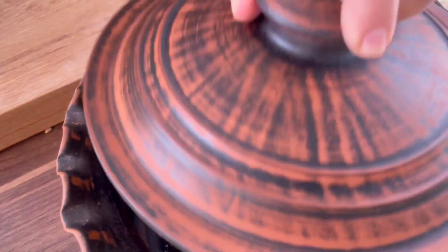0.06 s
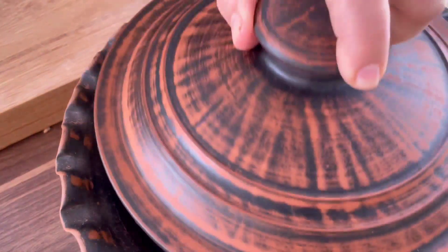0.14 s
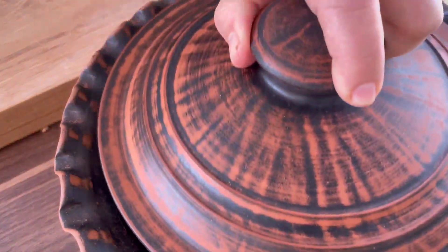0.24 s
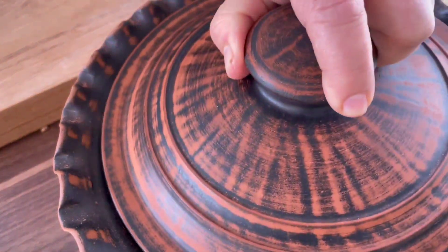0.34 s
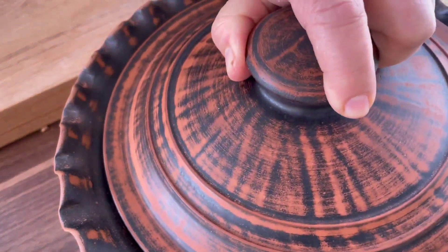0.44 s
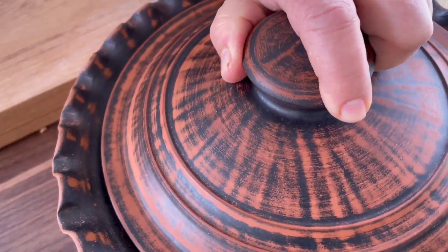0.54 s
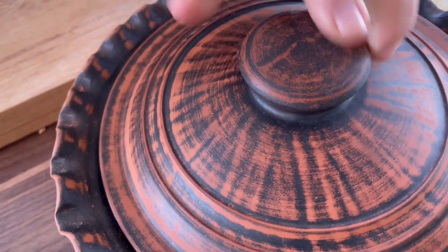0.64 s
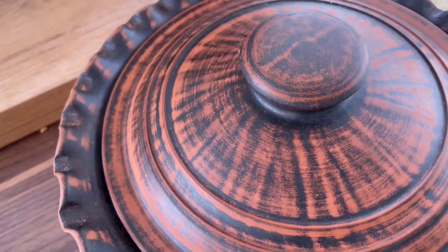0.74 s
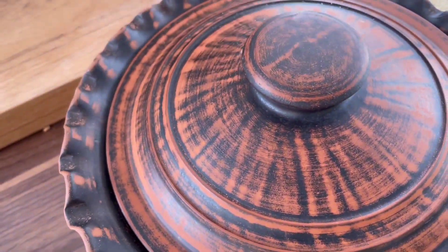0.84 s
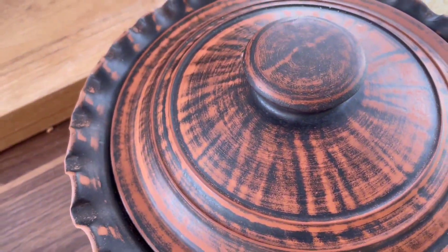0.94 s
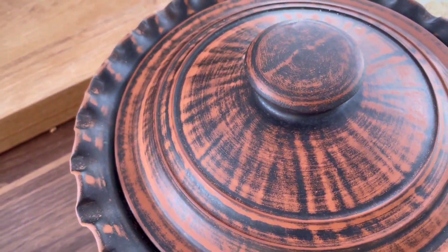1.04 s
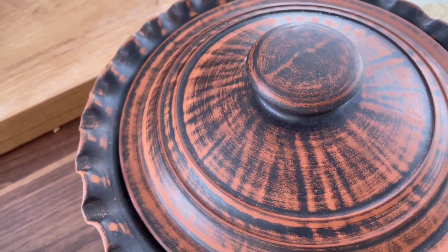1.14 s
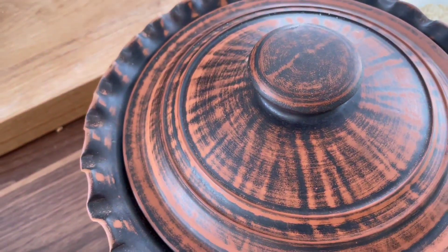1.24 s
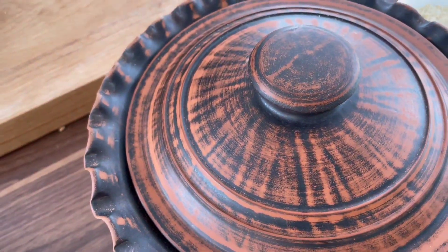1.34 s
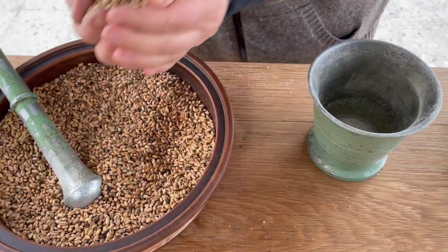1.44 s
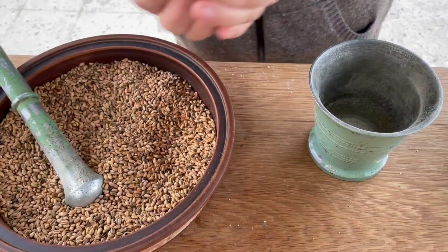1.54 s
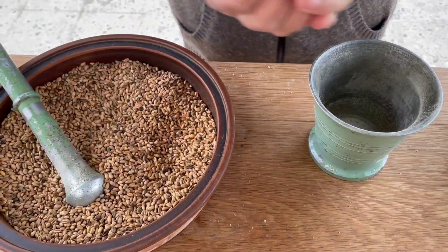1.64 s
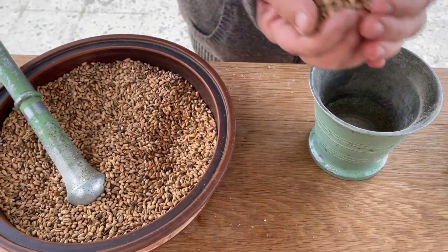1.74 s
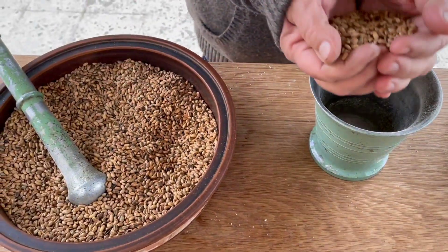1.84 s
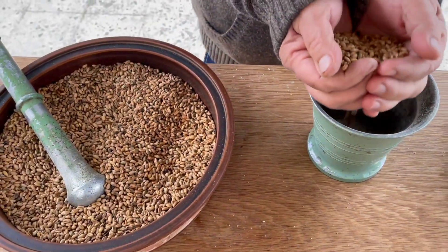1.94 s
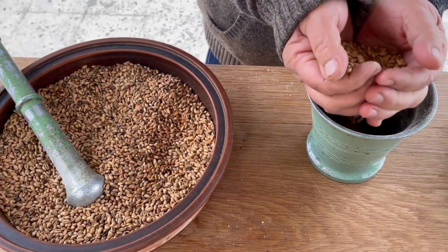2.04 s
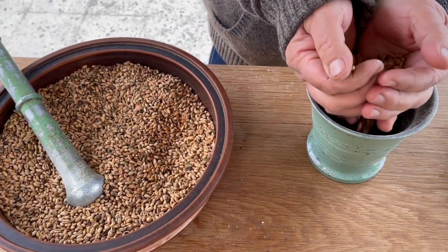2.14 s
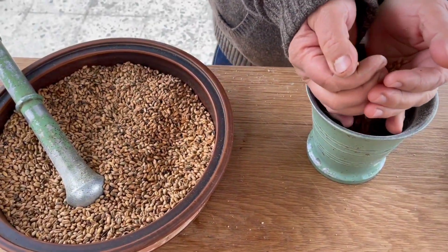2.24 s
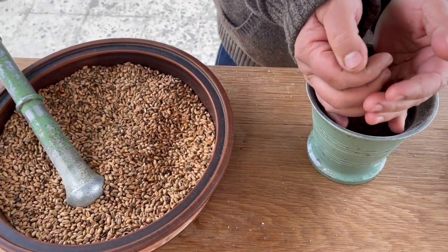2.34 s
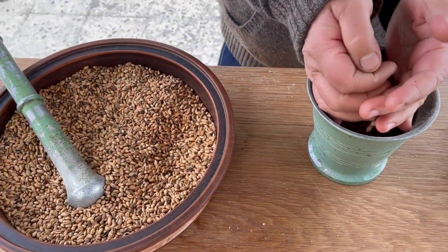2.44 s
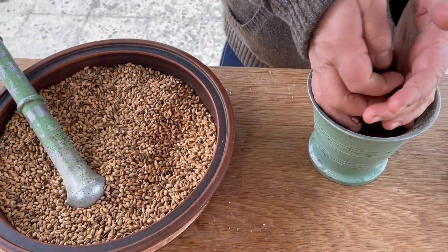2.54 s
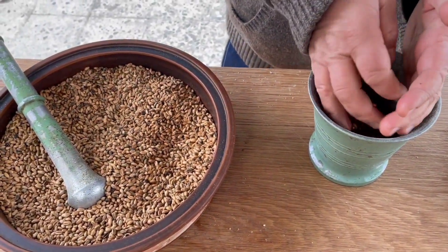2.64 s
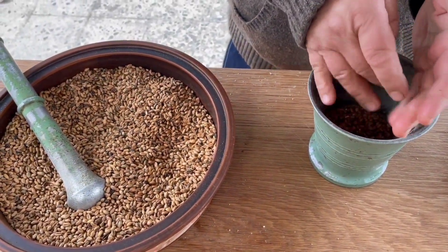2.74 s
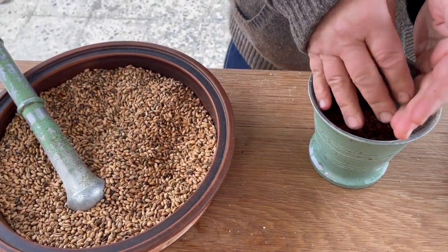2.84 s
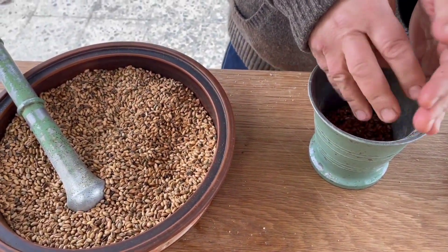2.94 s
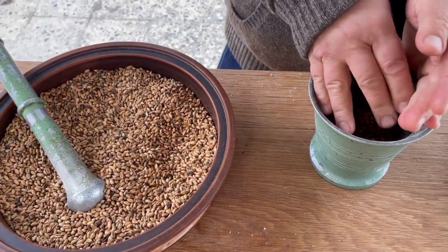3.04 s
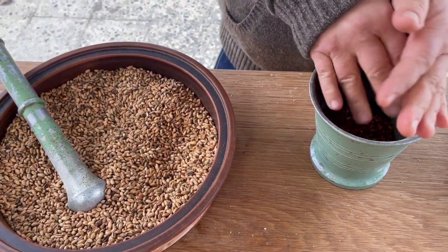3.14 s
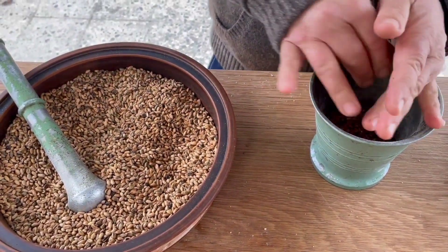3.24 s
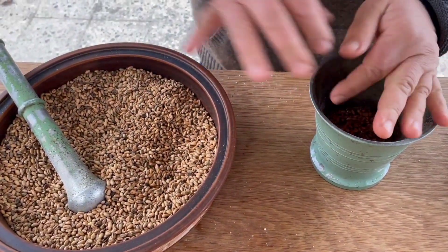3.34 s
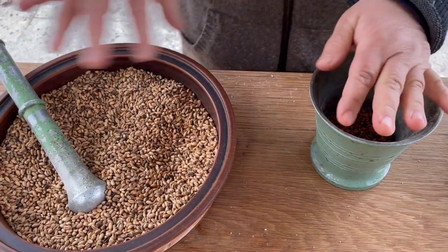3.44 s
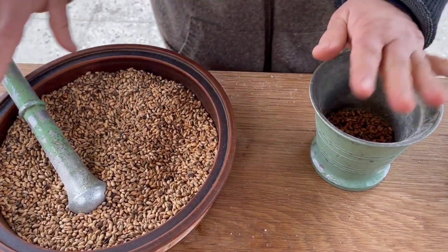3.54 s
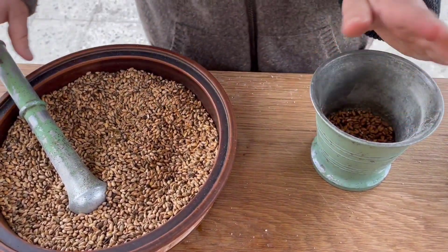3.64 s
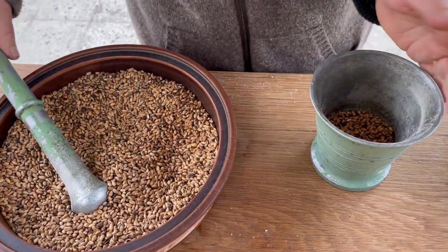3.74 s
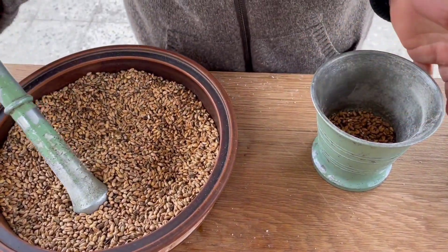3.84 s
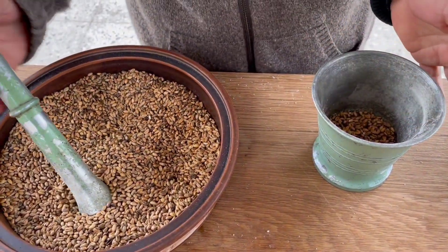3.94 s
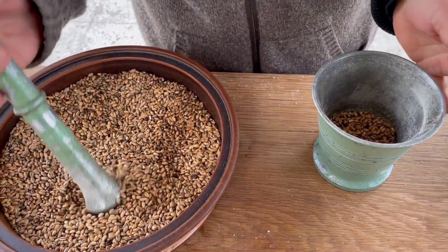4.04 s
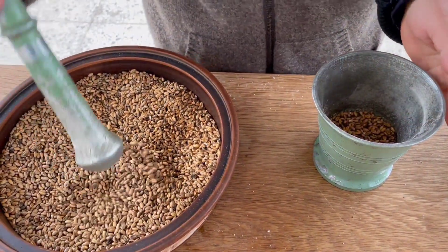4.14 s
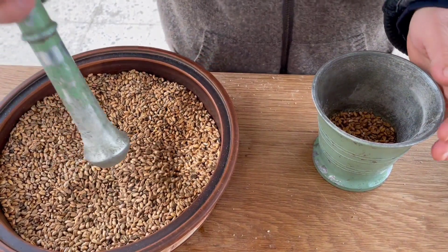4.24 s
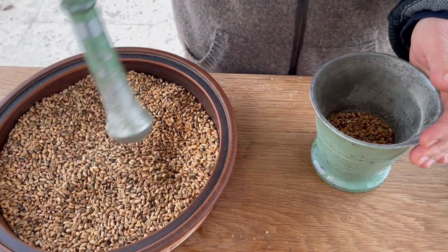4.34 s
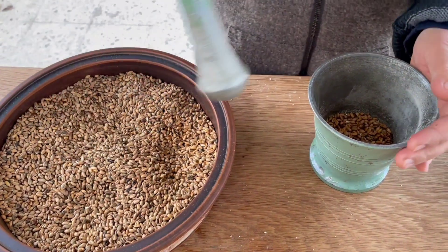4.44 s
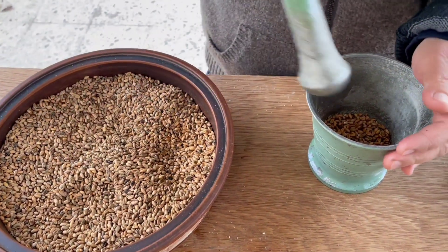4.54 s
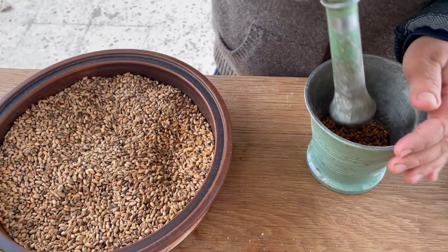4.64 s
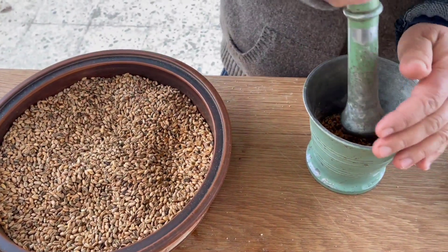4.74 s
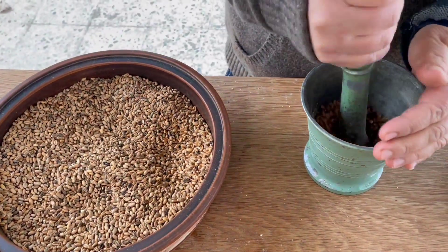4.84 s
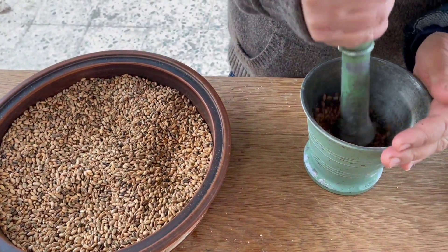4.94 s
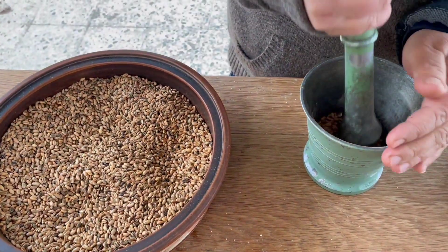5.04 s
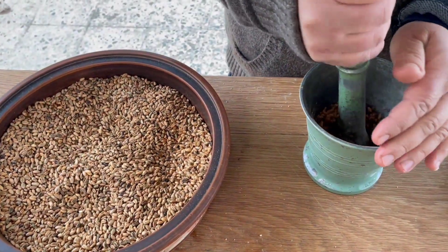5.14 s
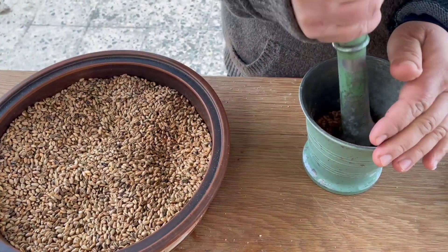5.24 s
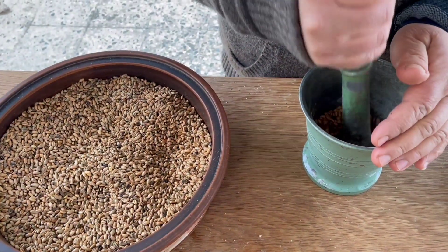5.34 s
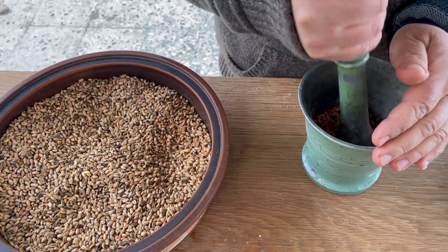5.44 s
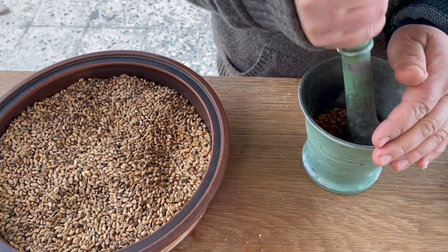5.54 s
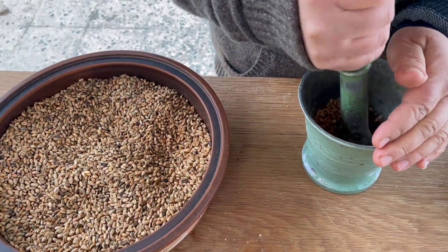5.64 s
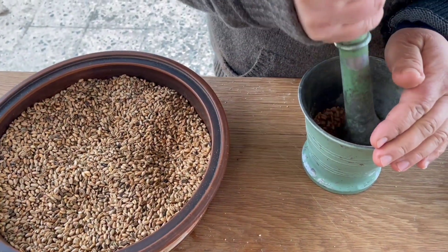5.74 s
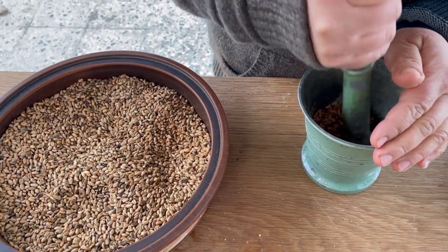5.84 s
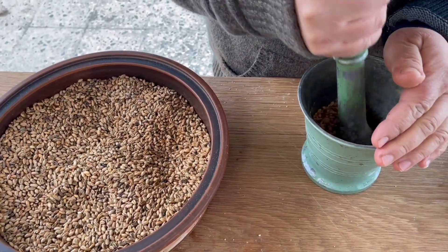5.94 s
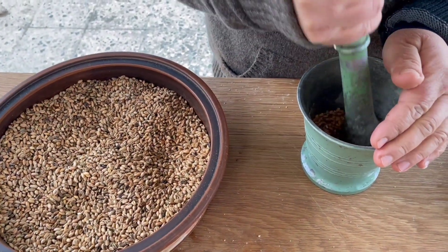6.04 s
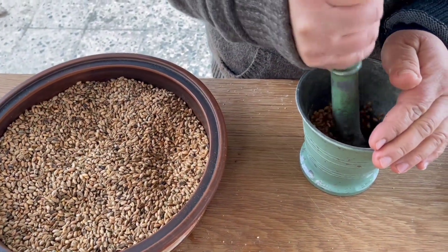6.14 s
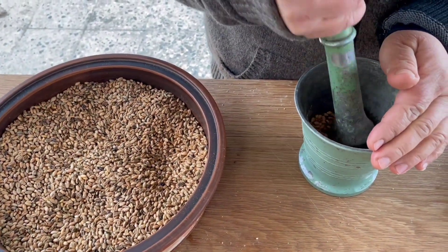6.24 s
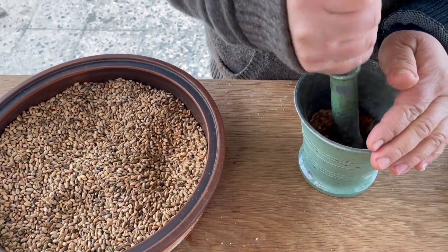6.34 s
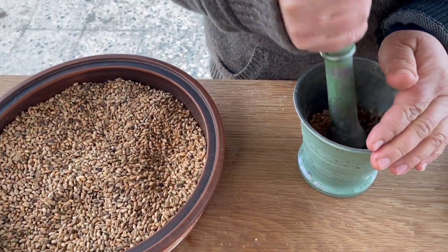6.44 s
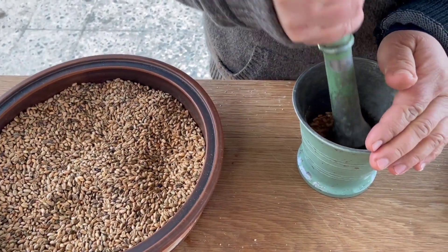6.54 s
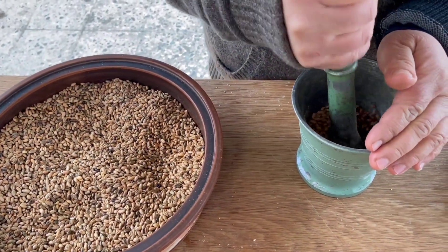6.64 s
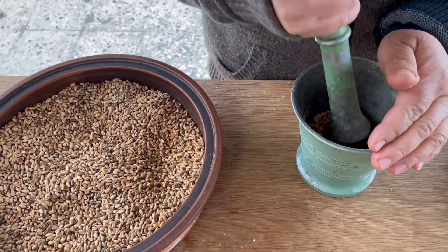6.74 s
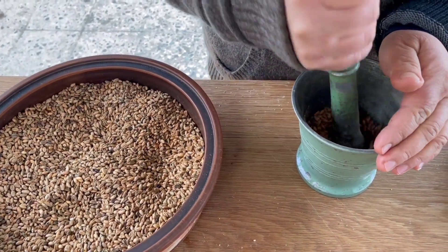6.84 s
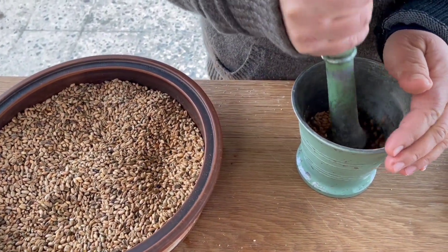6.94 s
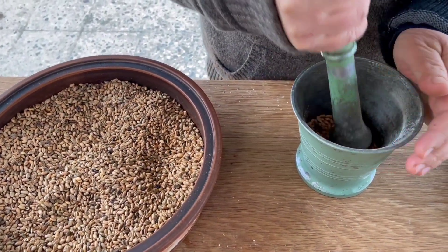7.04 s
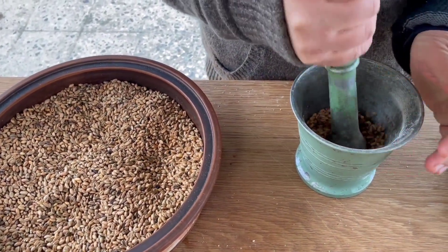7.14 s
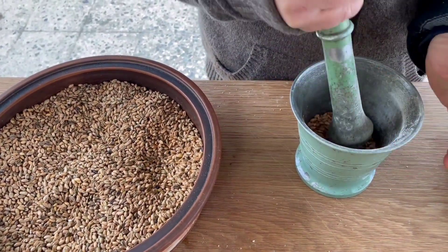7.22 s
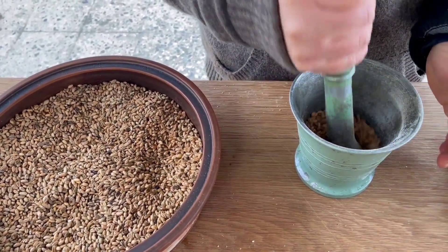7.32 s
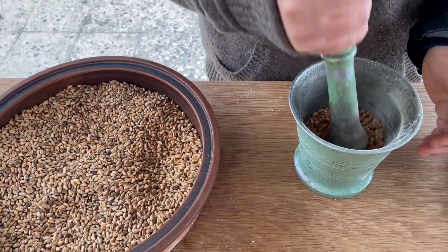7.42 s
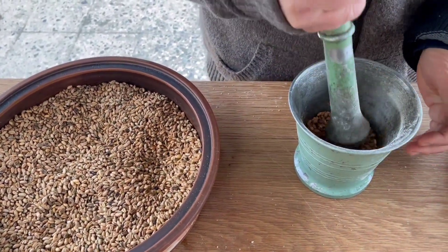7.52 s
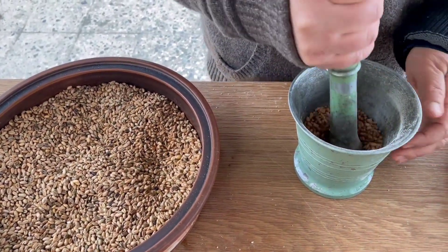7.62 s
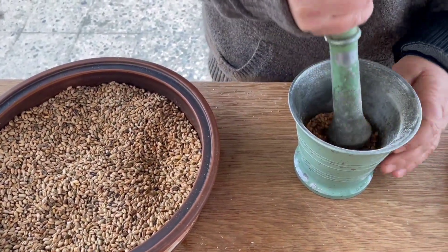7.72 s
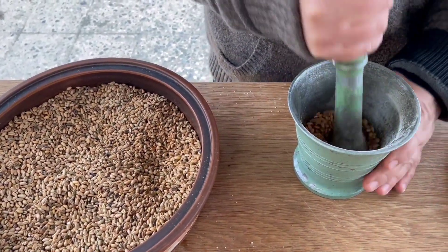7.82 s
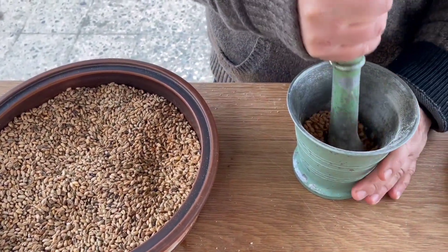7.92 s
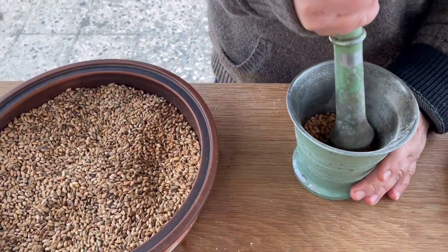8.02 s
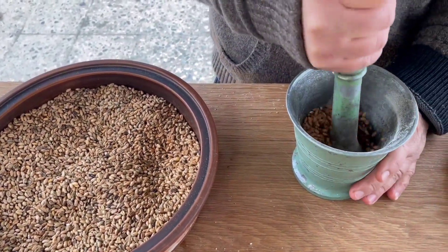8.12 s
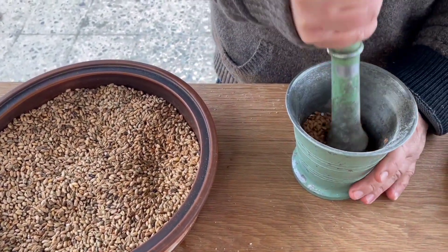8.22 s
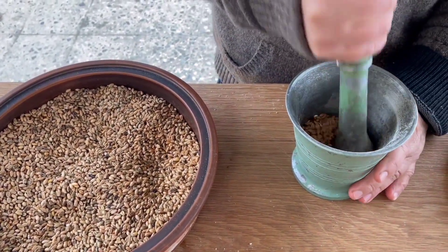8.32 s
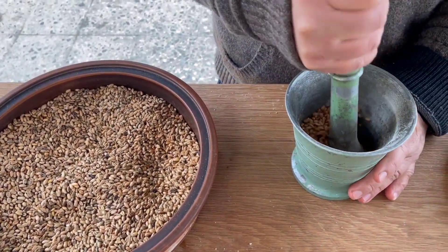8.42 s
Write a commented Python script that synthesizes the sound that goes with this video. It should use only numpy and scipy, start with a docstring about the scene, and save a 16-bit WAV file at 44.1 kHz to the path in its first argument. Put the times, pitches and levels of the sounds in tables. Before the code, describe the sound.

Close stereo outdoors: a fired-clay lid lands on a bowl with hollow clunks and a few settling knocks. Grain then rustles softly by hand into a small metal mortar, with tiny bright pings. A pestle pounds it about four times a second, each blow a crunch, a dull board thud and a faint thin clink. Birds whistle and chirp throughout over quiet air, and light wind rumbles on the microphones.

```python
"""A short soft band of hiss opens the scene while a clay lid is lowered and rocks on its bowl: each contact
sums dying modes and a crack. Then grain is poured by hand into a small metal mortar on a board: random
clicks rustle, modes ping. A pestle then pounds it four times a second: a crunch, a thud through the board,
a thin ring of the metal. Throughout, birds whistle in the garden as gliding sines with echoes, over a bed
of air noise, and a light wind rumbles and thumps on the two microphone ports as shaped noise and bumps."""
import sys
import numpy as np
from scipy import signal
from scipy.fft import rfft, irfft, next_fast_len
from scipy.io import wavfile
from scipy.ndimage import uniform_filter1d

SR = 44100
rng = np.random.default_rng(int(sys.argv[2]) if len(sys.argv) > 2 else 0)


def to_wav(s):
    """Save 16-bit WAV."""
    ch = np.atleast_2d(s).T  # columns
    pcm = np.round(np.clip(ch, -1, 1) * 32767)  # PCM
    wavfile.write(sys.argv[1], SR, pcm.astype(np.int16))


def volts_from_decibels(level):
    """Turn decibel levels (scalar or array-like) into linear amplitude factors."""
    exponent = np.asarray(level, float) / 20
    return 10 ** exponent


N = 373960

# Modes of the metal mortar. Each row: frequency in Hz, level in dB, free ring time (t60) in seconds.
MORTAR = [(1733, -15, .22), (10910, -14, .1), (11900, -16, .1), (12530, -14, .06), (12663, 0, .15),
          (12810, -11, .065), (13680, -13, .07), (14340, -18, .08)]
# Spectrum of cracking and rubbing kernels. Each row: frequency in Hz, density in dB per Hz.
CRUNCH = [(500, 1), (900, -12.5), (3000, -1), (6500, -9.5), (10000, 0.5), (13000, -4.5), (15200, -10.5),
          (16200, -56)]
# Strength of the wind on the ports. Each row: time in seconds, rumble in dB, buffeting in dB.
WIND = [(0, -52.5, -65), (0.13, -59, -56), (0.3, -35, -27.5), (0.55, -37, -49), (0.85, -25, -42),
        (1.15, -39.5, -51), (1.6, -39.5, -55.5), (1.85, -63.5, -65.5), (2.1, -44.5, -55.5), (3, -45.5, -53),
        (3.3, -43, -44), (3.55, -42, -51.5), (4.2, -38.5, -41.5), (5, -35.5, -37.5), (6, -35, -35.5),
        (7, -32.5, -37), (7.5, -36.5, -41.5), (8.48, -36, -34)]
# Spectrum of the buffeting. Each row: frequency in Hz, density in dB per Hz.
BUFFET = [(90, -6.5), (160, 2), (330, -9.5), (600, -23), (1200, -48), (3500, -89)]


def pestle():
    """Fracture, then impact: the head cracks kernels, thuds, and clinks on the metal bottom."""
    # Pestle blows. Each row: start in seconds, thud in dB, upper thud in dB relative to it,
    # click on the bottom in dB, ring of the metal in dB.
    blows = [(4.879, -8.5, 6, -13.5, -24.5), (5.137, -9.5, -1.5, -30, -29.5), (5.39, -12.5, 1.5, -19, -24),
             (5.633, -11, 0, -19, -51), (5.887, -11, 5, -10.5, -25), (6.13, -8.5, -0.5, -15.5, -59),
             (6.38, -9, 6.5, -11, -19.5), (6.636, -8.5, 1.5, -19, -24), (6.887, -8, 5.5, -16.5, -36),
             (7.123, -12, -4, -15.5, -29), (7.392, -10, 3.5, -20, -24.5), (7.65, -10, 1, -13, -28.5),
             (7.902, -8.5, 0.5, -21, -22), (8.16, -10, 14, -38, -28.5), (8.407, -8.5, 9.5, -10, -25)]
    # The head clicks a second time on the bottom: start in seconds, level in dB.
    rebound_s, rebound_db = (6.386, -11.5)
    # The pestle knocks as it leaves the dish. Each row: start in seconds, thud in dB, upper thud in dB relative.
    lift = [(3.985, -47, 26.5), (4.014, -40, 26.5)]
    # Left over right level of the board sound. Each row: frequency in Hz, difference in dB.
    board_tilt = [(300, -0.5), (650, -10), (780, 6), (1400, 1.3)]
    # Extra phase of the later blows, which lag on the left. Each row: frequency in Hz, left lead in radians.
    late_lead = [(200, -0.05), (350, -1.5), (550, -2.5), (750, -5.5)]
    late_s = 6.25
    crunch_lead_s = 0.037  # kernels crack before the thud
    hand_off_s, hand_damping = 7.05, 0.23  # until the palm leaves the rim, ring times shrink by this factor

    out = np.zeros(N)
    t = np.arange(SR // 8) / SR
    before_db = 7 * (t / crunch_lead_s - 1)
    after_db = -(t - crunch_lead_s) * 1900
    swell = np.minimum(t / 0.0041, 1) * volts_from_decibels(np.where(t < crunch_lead_s, before_db, after_db))
    for s, db, upper_db, click_db, ring_db in blows:
        crunch_db = db - 24 + 0.21 * upper_db  # louder in a brighter blow
        crunch = swell * colour(crackle(len(t), 7000, 1.8), CRUNCH)
        add(out, s - crunch_lead_s, volts_from_decibels(crunch_db) * crunch)
        thud(s, db, upper_db, out)
        add(out, s, volts_from_decibels(click_db) * click(0.0013, CRUNCH))
        damping = hand_damping if s < hand_off_s else 1
        metal = [(hz, level, t60 * damping) for hz, level, t60 in MORTAR]
        add(out, s, volts_from_decibels(ring_db) * ring(metal, uneven_db=5.5))
    add(out, rebound_s, volts_from_decibels(rebound_db) * click(0.0017, CRUNCH))
    for row in lift:
        thud(*row, out)
    out = sag(out)
    late = np.arange(N) > late_s * SR
    return ports(out * ~late, -5.5, board_tilt) + ports(out * late, -6, board_tilt, late_lead)


def thud(s, db, upper_db, out):
    """Modal response: contact excites the board, inside a gritty swell of grain that packs and settles."""
    # Modes of mortar foot and board. Each row: frequency in Hz, level in dB, ring time (t60) in seconds.
    board = [(131, -4, 0.15), (180.6, -6.5, 0.14), (271, 4, 0.14), (351.3, 2, 0.11), (473.6, -13, 0.17),
             (594, -4, 0.031), (729, 9, 0.0074), (951, -5.5, 0.029), (1503, -12, 0.019)]
    # Spectrum of grain packing under the head. Each row: frequency in Hz, density in dB per Hz.
    packing = [(120, -2), (300, 8.5), (700, -4), (1300, -19.5), (3000, -66)]
    pack_db, pack_rise_s, pack_fall_s = -14.5, 0.011, 0.026

    low = [mode for mode in board if mode[0] < 650]
    high = board[len(low):]
    add(out, s - .002, volts_from_decibels(db + 1.0) * ring(low, 0.0096, 0.062, 3.))
    add(out, s - .007, volts_from_decibels(db + upper_db) * rattle(ring(high, 0.00071, 0.077, 2.2), 0.025, 0.0054))
    t = np.arange(-SR // 20, SR // 5) / SR
    swell = np.exp(np.minimum(t / pack_rise_s, -t / pack_fall_s))
    grit = swell * colour(crackle(len(t), 350, 4.5), packing)
    add(out, s + t[0], volts_from_decibels(db + pack_db + upper_db / 2) * grit)


def lid():
    """Impact excitation: each contact cracks, thuds in the hollow bowl and rings the fired clay."""
    # Lid contacts. Each row: start in seconds, thud in dB, clay ring in dB,
    # upper modes in dB relative to the ring (how hard the contact is).
    hits = [(0.145, 2, -16, 2.5), (0.157, -6.5, -47, -25), (0.186, -3, -16, -11.5), (0.214, -14, -32.5, 9),
            (0.276, -11, -34, -25), (0.296, -7.5, -19.5, -19.5), (0.338, -10, -28, -15),
            (0.362, 2, -6, -16), (0.413, -15.5, -33.5, -7), (0.645, -25.5, -60, -26), (0.698, -4, -40, -18),
            (0.756, -12, -44, -25), (0.8, -20, -62, -38), (1.007, -5.5, -24, -30), (1.085, -22.5, -50, -30),
            (1.334, -26, -39.5, -23), (1.363, -24, -38, -20)]
    # Modes of the hollow bowl on the board. Each row: frequency in Hz, level in dB, ring time (t60) in seconds.
    bowl_modes = [(127, -13.5, 0.434), (159, -7.5, 0.18), (242, -5, 0.08), (293, -6, 0.072),
                  (348, 3.5, 0.024), (463, 0.5, 0.015), (465.5, -14, 0.13), (582, -5, 0.035),
                  (612, -12.5, 0.11)]
    # Modes of the clay lid. Each row: frequency in Hz, level in dB, free ring time (t60) in seconds.
    lid_modes = [(670, -9, 0.14), (890, 4.5, 0.11), (1087, -4.5, 0.071), (1417, -16.5, 0.21),
                 (1597, 1, 0.064), (1726, -13, 0.15), (1980, -18, 0.053), (2370, -16, 0.059),
                 (2953, -5.5, 0.057), (3440, -6.5, 0.055), (4220, -21, 0.036), (4470, -13.5, 0.11)]
    # Resonance of the air under the lid, falling at first, slightly higher at the end.
    # Each row: time in seconds, frequency in Hz.
    hollow = [(.15, 303.3), (.2, 285), (.3, 240), (.37, 170), (.8, 166), (1., 191)]
    # Rough clay grinding at a hard contact. Each row: frequency in Hz, density in dB per Hz.
    grit_spectrum = [(2000, -30), (2800, -2), (4700, 6), (5800, -36)]
    crack_spectrum = [(300, 3.0), (1500, 21.0), (4500, -11.5), (6500, -63)]  # Hz, dB per Hz
    hollow_db, hollow_t60 = -1.5, 0.089  # over the thud; s
    crack_db, grit_db = -7, 2.5  # over the clay ring; over its upper modes
    seated_s, seated_damping = .5, .35  # once seated on the rim, the low modes' ring times shrink by this factor

    out = np.zeros(N)
    for s, thud_db, ring_db, upper_db in hits:
        damping = seated_damping if s > seated_s else 1
        low = [(hz, level, t60 * damping) for hz, level, t60 in lid_modes if hz < 2500]
        high = lid_modes[len(low):]
        hollow_hz = np.interp(s, *np.transpose(hollow))
        hard_db = ring_db + upper_db
        add(out, s, volts_from_decibels(thud_db) * ring(bowl_modes, 0.00068, 0.085, 2.5))
        add(out, s, volts_from_decibels(thud_db + hollow_db) * ring([(hollow_hz, 0, hollow_t60)], 0.0031))
        add(out, s, volts_from_decibels(ring_db) * rattle(ring(low, .0003, .012, 3.), .0002, .003))
        add(out, s, volts_from_decibels(hard_db) * rattle(ring(high, 0.00024, 0.014, 1.8), 0.00027, 0.01))
        add(out, s, volts_from_decibels(ring_db + crack_db) * click(0.0015, crack_spectrum))
        add(out, s, volts_from_decibels(hard_db + grit_db) * click(0.0066, grit_spectrum))
    return ports(sag(out), -4.5)


def opening_hiss():
    """Band-shaped noise: a short soft band-limited hiss at the start, which ends at 0.19 s."""
    # Spectrum of the hiss. Each row: frequency in Hz, density in dB per Hz.
    hiss = [(2500, -23), (5500, 13.5), (10000, 8), (11000, -25)]
    end_s, level_db = 0.19, -46
    t = np.arange(N) / SR
    fade = np.clip((end_s - t) / .01, 0, 1)
    return field(hiss, level_db, size=512, patchy_db=4, lumpy_db=2) * fade


def grain():
    """Granular noise: kernels rustle on each other in clumps and excite modes of the bare mortar wall."""
    # Kernels falling from the hands. Each row: time in seconds, level in dB.
    pour = [(1.97, -63), (2.0, -59.5), (2.15, -46), (2.27, -47), (2.42, -54.5), (2.78, -66.5), (3.15, -65),
            (3.4, -81)]
    # Short rustles of hands, lid and grain. Each row: start in seconds, length in seconds, level in dB.
    rustles = [(0.172, 0.068, -43), (.53, 0.17, -57.5), (1.293, 0.11, -59), (3.314, 0.041, -59),
               (3.932, 0.29, -54.5), (4.654, 0.21, -63)]
    # Kernels on the still bare metal. Each row: time in seconds, level in dB.
    ping_level = [(1.975, -72), (1.985, -43), (2.2, -45.5), (2.3, -54)]
    # The first kernel rings the empty mortar: start in seconds, level in dB.
    first_s, first_db = (1.986, -35.5)
    # Single kernels. Each row: start in seconds, level in dB.
    ticks = [(2.828, -28.5), (3.046, -37.5)]
    rustle_soft = 0.39  # share of a rustle spent rising and falling
    snap_db = 2.5  # snap of a single kernel over its ring

    t = np.arange(N) / SR
    wall = MORTAR[1:]
    clumps = volts_from_decibels(1.2 * evened(uniform_filter1d(rng.standard_normal(N), size=900)))
    rustle = colour(clumps * crackle(N, 9000, 3.0), CRUNCH)
    level = volts_from_decibels(np.interp(t, *np.transpose(pour), -120, -120))
    for s, length, db in rustles:
        add(level, s, volts_from_decibels(db) * signal.windows.tukey(round(length * SR), rustle_soft))
    out = level * rustle
    pings = evened(signal.oaconvolve(crackle(N, 120, 3.5), ring(wall, .001))[:N])
    out = out + volts_from_decibels(np.interp(t, *np.transpose(ping_level), -120, -120)) * pings
    add(out, first_s, volts_from_decibels(first_db) * ring(wall))
    for s, db in ticks:  # each kernel lands on another part of the wall
        spot = [(hz * rng.uniform(.93, 1.07), rng.uniform(-15, 0), .05) for hz, _, _ in wall]
        add(out, s, volts_from_decibels(db) * ring(spot))
        add(out, s, volts_from_decibels(db + snap_db) * click(0.0038, CRUNCH))
    return ports(out, 5.3)


def whistles():
    """Frequency glides: whistled notes slide from start to end, or step quickly to a pitch and hold it."""
    # Sliding notes. Each row: start in seconds, length in seconds, first Hz, last Hz, level in dB.
    slides = [(1.21, 0.097, 2073, 2046, -44.5), (1.22, 0.12, 1740, 1718, -52),
              (1.5, 0.095, 1993, 2317, -46.5), (1.6, 0.12, 2274, 2275, -47),
              (1.72, 0.22, 2155, 2023, -48.5), (2.17, 0.19, 1824, 1740, -42),
              (2.46, 0.046, 2650, 2830, -42), (2.49, 0.092, 2760, 1953, -35),
              (3.59, 0.085, 2726, 2260, -38), (4.18, 0.056, 2366, 2650, -39), (5.04, 0.17, 2130, 2045, -51),
              (5.21, 0.12, 2580, 2190, -48), (5.38, 0.1, 2620, 2820, -50), (5.52, 0.19, 2397, 2327, -49),
              (5.77, 0.1, 1890, 1777, -48), (5.95, 0.26, 2065, 2100, -48.5), (6.64, 0.12, 2520, 2093, -45),
              (7.26, 0.091, 1940, 2226, -40.5), (7.44, 0.081, 2053, 1727, -41.5),
              (7.585, 0.043, 2640, 3290, -47), (7.67, 0.052, 1946, 2373, -38.5),
              (7.705, 0.052, 2427, 1826, -38), (7.87, .22, 2903, 2128, -36.5)]
    # Stepped notes. Each row: start in seconds, length in seconds, first Hz, held Hz, level in dB.
    steps = [(2.23, 0.14, 2450, 2260, -46), (2.575, 0.087, 1960, 2423, -37), (3.065, 0.18, 2180, 1951, -34),
             (3.32, 0.19, 2120, 1946, -36.5), (3.72, 0.155, 2515, 1772, -40),
             (4.225, 0.085, 2750, 2108, -37), (4.49, 0.052, 2274, 2106, -39)]
    notes = slide(slides, fade_db=2.5) + slide(steps, fade_db=1.5, glide_s=0.061)
    return birds(notes, -0.24, 0.84, -2.1)


def burrs():
    """Frequency modulation: a fast warble roughens each note."""
    # Warbled notes. Each row: start in seconds, length in seconds, first Hz, last Hz, level in dB.
    warbled = [(1.87, 0.076, 7600, 6240, -48.5), (1.94, 0.14, 6620, 5900, -50.5),
               (2.77, 0.077, 2380, 2680, -39), (2.84, 0.098, 2342, 1574, -38.5),
               (3.68, 0.071, 2570, 2590, -38), (7.62, 0.053, 2053, 2074, -36)]
    return birds(slide(warbled, fade_db=-1), -0.22, 0.59, -0.93, warble_hz=260)


def seeps():
    """Near-pure tones: thin high calls that slide in pitch, together with the trills."""
    # Thin high calls. Each row: start in seconds, length in seconds, first Hz, last Hz, level in dB.
    calls = [(.04, 0.076, 6260, 5080, -48.5), (1.29, 0.12, 7460, 8200, -51), (1.47, 0.077, 7460, 7950, -52),
             (3.27, 0.082, 4800, 4520, -51.5), (3.72, 0.086, 4600, 4590, -51),
             (4.05, 0.18, 7300, 6530, -48.5), (4.2, 0.086, 4730, 4450, -52), (4.32, 0.2, 7170, 6410, -50),
             (4.42, 0.06, 5630, 4300, -54), (4.6, 0.23, 6970, 6320, -49.5), (4.625, 0.065, 5660, 4000, -51),
             (4.66, 0.08, 4630, 4480, -52), (4.885, 0.058, 5600, 5080, -42.5),
             (5.02, 0.087, 5880, 4950, -45), (5.1, 0.18, 4640, 4400, -52.5), (4.9, 0.083, 3880, 3900, -52),
             (7.41, 0.07, 6800, 5950, -55), (7.48, 0.16, 5890, 6320, -56), (7.75, 0.11, 6580, 5950, -57),
             (7.95, 0.1, 6500, 5950, -59)]
    return birds(slide(calls, fade_db=-3.5) + trills(), 0, 0.93, 0.59)


def trills():
    """Periodic repetition: each chirp sweeps upward for about half of its beat; some are fainter."""
    # Runs of short rising chirps. Each row: first second, last second, chirps per second, highest base level in dB.
    runs = [(1.854, 3.1, 9.3, -49), (6.045, 6.85, 10, -50.5)]
    notes = []
    for start_s, end_s, per_s, db in runs:
        for s in np.arange(start_s, end_s, 1 / per_s):
            chirp_db = db - 6 * rng.random()
            notes.append([(s, 4550, chirp_db + 2), (s + 0.053, 4980, chirp_db)])
    return notes


def chorus():
    """Reverberant distance: many far birds as short random glides, mostly echo."""
    # Far birds. Each row: lowest starting Hz, highest starting Hz, notes per second, middle level in dB.
    flocks = [(1740, 2900, 20, -65), (4090, 4900, 14, -63)]
    notes = []
    for low_hz, high_hz, per_s, db in flocks:
        when, pitch, glide, length, size = rng.random((400, 5))[:int(per_s * N / SR)].T
        from_hz = low_hz + (high_hz - low_hz) * pitch
        to_hz = from_hz * (.85 + .25 * glide)
        rows = zip(when * N / SR, from_hz, to_hz, 0.0386 + 0.11 * length, db + 9 * (size - .5))
        notes += [[(s, a, level), (s + d, b, level)] for s, a, b, d, level in rows]
    return birds(notes, 5.6, 0.16, 0, warble_hz=80)


def slide(notes, fade_db, glide_s=np.inf):
    """Piecewise-linear pitch: it runs to its goal within glide_s and holds; the level moves by fade_db."""
    lines = []
    for s, length, from_hz, to_hz, db in notes:
        bend_s = min(glide_s, .999 * length)
        bend_db = db + fade_db * min(glide_s / length, 1)
        lines.append([(s, from_hz, db), (s + bend_s, to_hz, bend_db), (s + length, to_hz, db + fade_db)])
    return lines


def birds(notes, wet_db, t60, pan_db, warble_hz=0.):
    """Phase integration: near-sine notes waver or warble, smeared by echoes from walls and trees."""
    out = np.zeros(N)
    for rows in notes:
        s, hz, db = np.transpose(rows)
        t = np.arange(s[0], s[-1], 1 / SR)
        waver_hz = 14 * evened(uniform_filter1d(rng.standard_normal(len(t)), size=300))
        bend_hz = waver_hz + warble_hz * np.sin(2 * np.pi * 58 * t)
        tone = np.sin(2 * np.pi * np.cumsum(np.interp(t, s, hz) + bend_hz) / SR)
        # each note's level flutters at random by 2 dB rms
        flutter_db = 2 * evened(uniform_filter1d(rng.standard_normal(len(t)), size=400))
        envelope = volts_from_decibels(np.interp(t, s, db) + flutter_db) * signal.windows.tukey(len(t), .25)
        add(out, s[0], envelope * tone)
    direct = out * volts_from_decibels(np.array([[pan_db], [-pan_db]]))
    return direct + volts_from_decibels(wet_db) * echoes(out, t60)


def wind():
    """Turbulent pressure: lumpy low noise, to which gusts add a higher buffeting."""
    # Spectrum of the rumble. Each row: frequency in Hz, density in dB per Hz.
    rumble_spectrum = [(22, -47), (40, -17), (65, 13.5), (110, 8.5), (200, -75)]
    smooth_db = -2.5  # smooth part of the buffeting, under the thumps
    s, rumble_db, buffet_db = np.transpose(WIND)
    t = np.arange(N) / SR
    rumble = field(rumble_spectrum, np.interp(t, s, rumble_db), size=2048, patchy_db=2.5, lumpy_db=3.5)
    buffet_level = np.interp(t, s, buffet_db) + smooth_db
    buffet = field(BUFFET, buffet_level, size=1024, patchy_db=5.5, lumpy_db=2.0)
    return rumble + buffet


def thumps():
    """Shot noise: small dull bumps follow the buffeting level, plus a few large single ones."""
    # Single dull bumps. Each row: time in seconds, level in dB.
    bumps = [(4.189, -17.5), (4.443, -18.5), (4.807, -17), (5.827, -15)]
    s, _, buffet_db = np.transpose(WIND)
    shape = np.roll(colour(np.arange(4096) == 0, BUFFET), 2048) * np.hanning(4096)
    dense = evened(signal.oaconvolve(crackle(N, per_s=140, spread_db=4.5), shape, "same"))
    out = dense * volts_from_decibels(np.interp(np.arange(N) / SR, s, buffet_db) - 2)
    for when, db in bumps:
        add(out, when - 2048 / SR, volts_from_decibels(db) * shape / shape.max())
    return ports(sag(out), -12)


def lull():
    """Amplitude gating: the gain of lid and wind, which drop briefly."""
    start_s, end_s, drop_db = 1.397, 1.44, -22
    t = np.arange(N) / SR
    inside = 1. * (t > start_s) * (t < end_s)
    return volts_from_decibels(drop_db * uniform_filter1d(inside, size=100))


def air():
    """Diffuse field: a soft bed of noise with slow drifts in its spectrum."""
    # Spectrum of the bed. Each row: frequency in Hz, density in dB per Hz.
    bed = [(180, -37), (300, 1), (1840, -6.5), (2070, 1), (2740, -3.5), (4670, -7.5), (7080, -10),
           (8500, -13), (9880, -19.5), (13100, -18.5), (14900, -22.5), (15700, -58)]
    return field(bed, -50, size=1024, patchy_db=5.0, lumpy_db=0.93)


def ring(modes, rise=0., spread=0., uneven_db=0.):
    """Modal synthesis: a set of dying modes, each contact tuning and weighting them a little differently."""
    t = np.arange(SR // 3) / SR
    hz, db, t60 = np.transpose(modes)[:, :, None]
    phase, tune, weight = rng.uniform(-0.75, 1, (len(modes), 3, 1)).transpose(1, 0, 2)
    decay = volts_from_decibels(db + uneven_db * weight - 60 * t / np.clip(t60, .01, .5))
    tones = decay * np.sin(2 * np.pi * hz * (1 + spread * tune) * t + np.pi * phase)
    onset = 1 - np.exp(-t / (rise + 1e-4))
    return tones.sum(0) * onset / np.sqrt(np.sum(volts_from_decibels(db) ** 2))


def rattle(x, rise, fall):
    """Convolution with a contact force: not one blow but a spray of small ones over some ms."""
    t = np.arange(SR // 20) / SR
    force = (1 - np.exp(-t / rise)) * np.exp(-t / fall) * crackle(len(t), 4000, 4.0)
    return signal.fftconvolve(x, force / np.linalg.norm(force + 1e-9))[:len(x)]


def click(fall, spectrum):
    """Transient noise: a burst at first contact that decays within milliseconds; peak 1."""
    t = np.arange(1024) / SR
    out = colour(rng.standard_normal(len(t)), spectrum) * np.exp(-t / fall)
    return out / abs(out).max()


def crackle(length, per_s, spread_db):
    """Random impulse process: sparse clicks of either sign, a few of them large."""
    size, chance, sign = rng.random((3, length))
    height = volts_from_decibels(-spread_db * np.log(size + 0.0084))
    return height * (chance < per_s / SR) * np.sign(sign - .5)


def sag(x):
    """Dispersion: low notes arrive later than high ones, so each knock bends downward."""
    lag_s = 0.00402  # delay scale; the group delay is lag_s * 300 / (60 + Hz)
    return filtered(x, lambda hz: np.exp(-2j * np.pi * lag_s * 300 * np.log(1 + hz / 60)))


def ports(x, loose_db, tilt=((1, 0),), extra=((1, 0),)):
    """Interaural-like cues: two ports hear phase and level gaps, plus early reflections of their own."""
    # Phase between the ports for near sources. Each row: frequency in Hz, left lead in radians.
    port_lead = [(130, -0.4), (220, -0.6), (400, -0.36), (600, 1.7), (1500, 0.5), (5000, 0.44), (7670, -3),
                 (9300, -3), (13400, -6.5), (16000, -4.5)]

    def turn(hz):
        phase = np.exp(.5j * (read(port_lead, hz) + read(extra, hz)))
        return (phase * volts_from_decibels(read(tilt, hz) / 2)) ** np.array([[1], [-1]])

    n = next_fast_len(N)
    near = irfft(rfft(x, n) * turn(np.fft.rfftfreq(n, 1 / SR)), n)[:, :N]
    # bass and top treble get little reflection, so they stay alike on both sides
    bright = filtered(x, lambda hz: hz ** 2 / (hz ** 2 + 300 ** 2) / (1 + (hz / 7000) ** 4))
    return near + volts_from_decibels(loose_db) * echoes(bright, .06)


def echoes(x, t60):
    """Exponential reverberant decay: a dying tail of random taps, other taps for each side."""
    t = np.arange(SR) / SR
    tail = rng.standard_normal((2, SR)) * volts_from_decibels(-60 * t / t60) * (t > .003)
    return signal.fftconvolve(x[None], tail / np.linalg.norm(tail[0]), axes=1)[:, :N]


def field(spectrum, level_db, size, patchy_db, lumpy_db):
    """Partly coherent noise: random short-time spectra with drifting patches and wide-band lumps."""
    # Likeness of the two sides. Each row: frequency in Hz, left-right correlation.
    likeness = [(60, 0.94), (200, 0.99), (600, 0.084), (1500, 0.36), (8500, -0.25), (14000, 0.62)]
    hop = size // 4
    frames, hz = N // hop + 5, np.fft.rfftfreq(size, 1 / SR)
    a, b, c, d, patches = rng.standard_normal((frames, len(hz), 5)).T
    patches = evened(uniform_filter1d(uniform_filter1d(patches, size=8, axis=0), size=10, axis=1))
    lumps = evened(uniform_filter1d(rng.standard_normal(frames), size=4))
    same = np.clip(read(likeness, hz), -1, 1)[:, None]
    left = a + 1j * b
    right = same * left + np.sqrt(1 - same ** 2) * (c + 1j * d)
    z = np.array([left, right])
    z *= volts_from_decibels(read(spectrum, hz)[:, None] + patchy_db * patches + lumpy_db * lumps)
    noise = signal.istft(z, nperseg=size, noverlap=size - hop)[1][:, :N]
    return volts_from_decibels(level_db) * evened(noise)


def colour(x, spectrum):
    """Spectral shaping: filters to the given spectrum and sets the rms to 1."""
    return evened(filtered(x, lambda hz: volts_from_decibels(read(spectrum, hz))))


def filtered(x, gain):
    """Linear filtering: multiplies the spectrum by gain(Hz)."""
    n = next_fast_len(len(x))
    return irfft(rfft(x, n) * gain(np.fft.rfftfreq(n, 1 / SR)), n)[:len(x)]


def evened(x):
    """Power normalization: sets the rms to 1."""
    return x / np.sqrt(np.mean(x ** 2) + 1e-20)


def read(points, hz):
    """Logarithmic frequency scale: interpolates a curve between its points."""
    f, value = np.transpose(points)
    return np.interp(np.log(hz + 1), np.log(f + 1), value)


def add(mix, s, sound):
    """Superposition: adds a sound to the mix in place, from second s."""
    part = mix[max(round(s * SR), 0):][:len(sound)]
    part += sound[:len(part)]


def scene():
    """Superposition of all sources at the two ports."""
    song = whistles() + burrs() + seeps()
    gated = lull() * (lid() + wind() + thumps())
    return pestle() + gated + opening_hiss() + grain() + song + chorus() + air()


def top_cut(x):
    """Nothing passes above the cut-off."""
    return signal.sosfilt(signal.butter(12, 16650, fs=SR, output="sos"), x)


def record(dry):
    """Linear filtering, then saturation: a dip in the treble near 8.5 kHz, soft overload on loud knocks."""
    # Treble response with a dip and a lift above it. Each row: frequency in Hz, gain in dB.
    treble = [(7000, -0.5), (8500, -6.5), (9600, 3.5)]
    heard = np.array([filtered(port, lambda hz: volts_from_decibels(read(treble, hz))) for port in dry])
    mix = 0.87 * np.tanh(heard / 1.018)
    return top_cut(mix)


dry = scene()
out = record(dry)
to_wav(out)
```